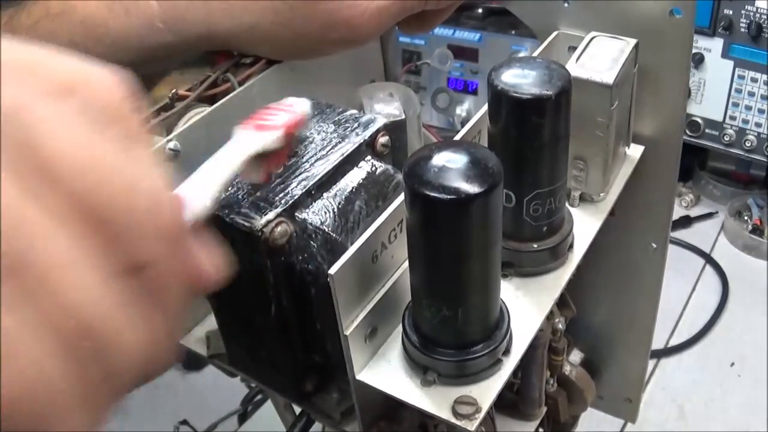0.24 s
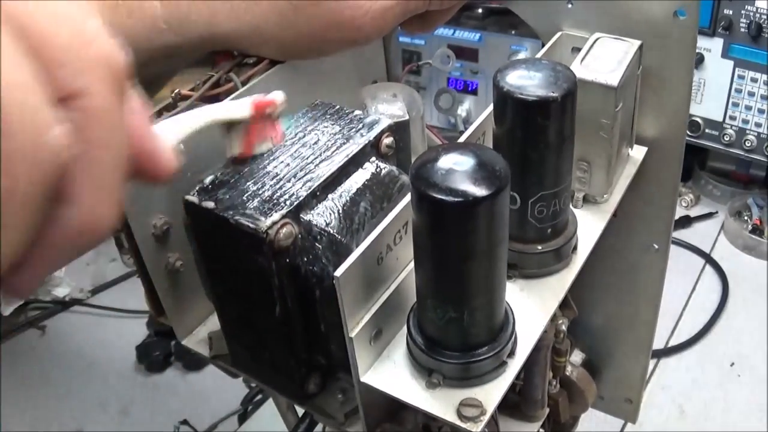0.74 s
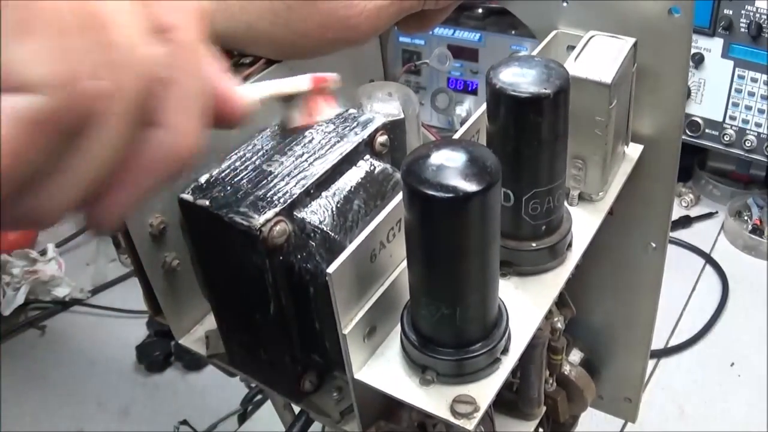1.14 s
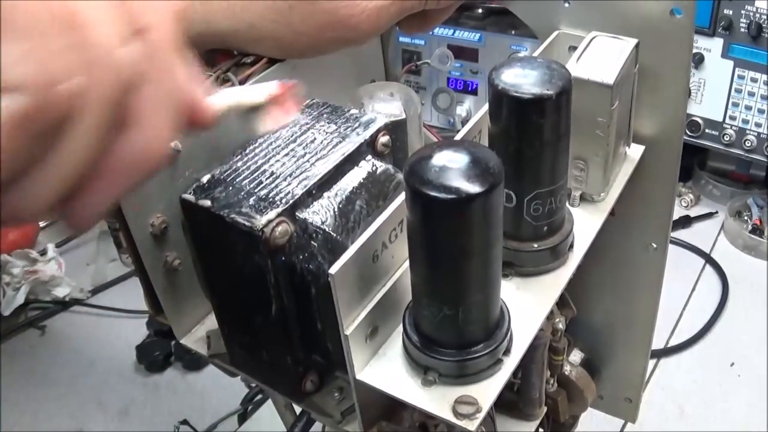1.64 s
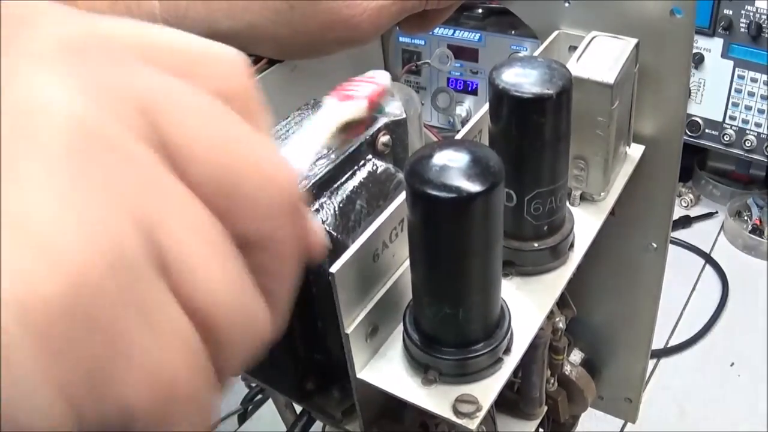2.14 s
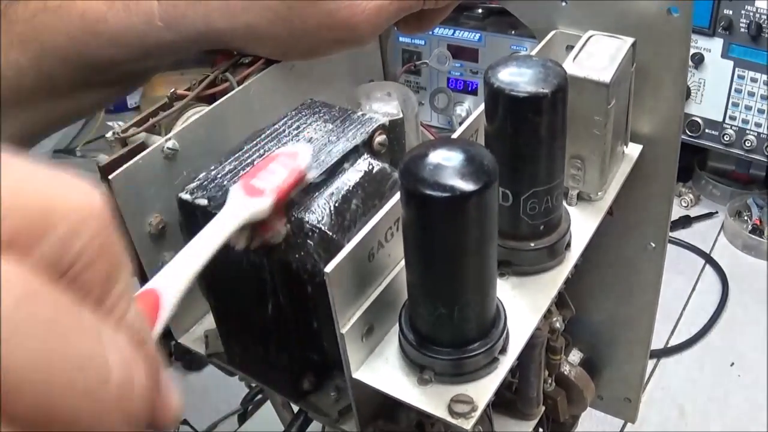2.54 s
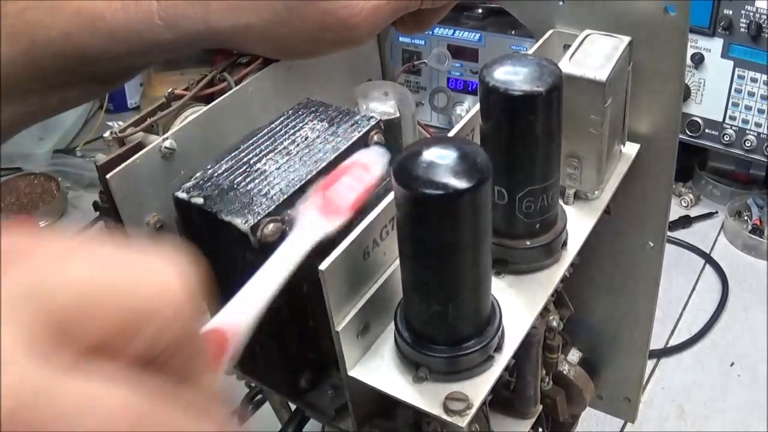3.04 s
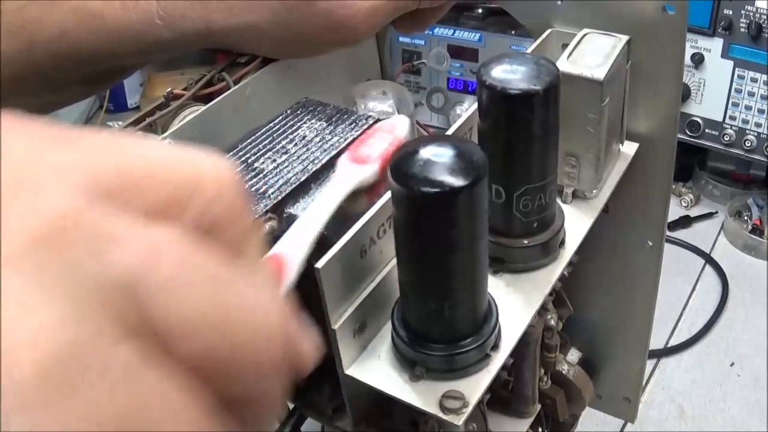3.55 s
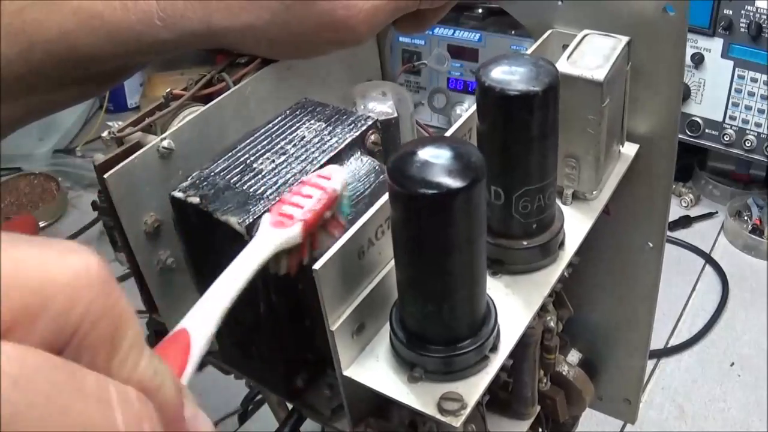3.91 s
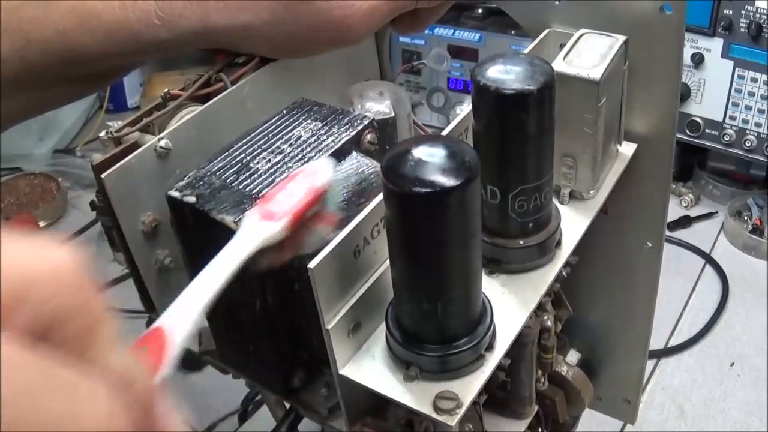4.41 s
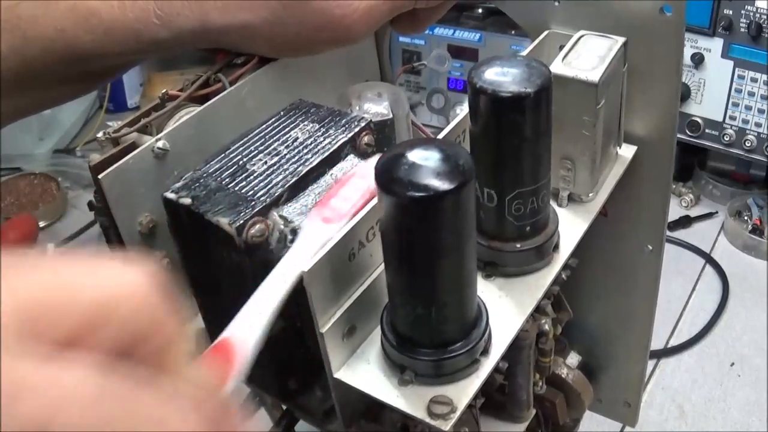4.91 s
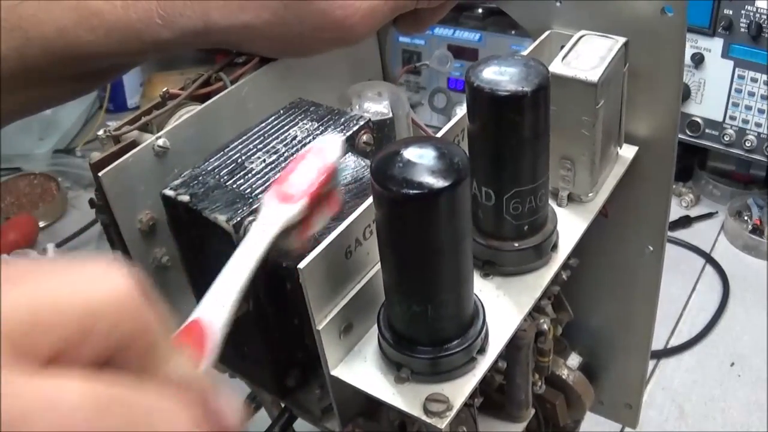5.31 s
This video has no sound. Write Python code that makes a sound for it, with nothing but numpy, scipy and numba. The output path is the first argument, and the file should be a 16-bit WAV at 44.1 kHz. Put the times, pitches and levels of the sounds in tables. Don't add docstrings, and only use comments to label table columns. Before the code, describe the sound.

Stiff toothbrush bristles scrub a ridged metal block in quick, even back-and-forth strokes, crisp and bright, with occasional plastic knocks on metal.

```python
import sys
import numpy as np
from scipy import signal
from scipy.fft import rfft, irfft
from scipy.io import wavfile
from scipy.ndimage import uniform_filter1d
from numba import njit

SR = 44100
rng = np.random.default_rng(int(sys.argv[2]) if len(sys.argv) > 2 else 0)


def persist_wave(psi):
    counts = np.round(np.clip(psi, -1, 1) * 32767).astype(np.int16)
    wavfile.write(sys.argv[1], SR, np.atleast_2d(counts).T)


def amplitude_ratio(level_db):
    exponent = np.asarray(level_db, float) / 20
    return 10 ** exponent


N = 245584
T = np.arange(N) / SR
TAPS = 8192
HZ = np.fft.rfftfreq(TAPS, 1 / SR) + 1e-3

# catch in seconds, length in seconds, effort in dB,
# late minus early loudness in dB, depth into the chassis gap [0-1].
PUSHES = [(-.025, 0.11, -15.5, 0.5, .45), (0.269, 0.091, -15.5, -3.5, 0.36), (0.541, 0.082, -16.5, 5, 0.55),
          (0.783, 0.098, -16, 1, 0.17), (1.044, 0.083, -16.5, 2, 0.34), (1.289, .1, -22, 3.5, 0.36),
          (1.533, 0.089, -19.5, 0, 0.2), (1.802, 0.091, -16.5, -2, 0.2), (2.071, 0.11, -17.5, 1.5, 0.4),
          (2.345, 0.11, -13.5, .5, 0.76), (2.629, 0.088, -12.5, 2, 0.53), (2.9, 0.097, -19.5, -1, 0.47),
          (3.166, .112, -20, 3, 0.05), (3.442, 0.1, -21.5, -3, 0.36), (3.711, .094, -15, 3, 0.66),
          (3.993, 0.1, -18, 1, 0.77), (4.246, 0.1, -17.5, 0.5, 0.83), (4.515, 0.093, -14, -4.5, 0.97),
          (4.772, .1, -16.5, 9.5, 0.87), (5.049, 0.11, -17, -2, 0.5), (5.314, 0.1, -17.5, 2.5, 0.88),
          (5.562, 0.053, -22, -1, 0)]
# catch in seconds, length in seconds, effort in dB,
# late minus early loudness in dB, depth into the chassis gap [0-1].
PULLS = [(0.117, 0.11, -18, -0.5, 0.03), (0.4, 0.093, -20, -5, 0.4), (0.652, 0.089, -12, -.5, 0.03),
         (.904, 0.1, -17.5, -1, 0.06), (1.176, 0.088, -18.5, -4, 0), (1.424, 0.083, -15.5, -1, 0.08),
         (1.667, 0.11, -18, -6, .05), (1.928, 0.1, -15, -1, 0.), (2.214, 0.099, -15.5, -2.5, .05),
         (2.484, 0.11, -10.5, -1.5, 0.18), (2.768, 0.1, -11.5, -8.5, 0.5), (3.051, 0.096, -12, -8, 0.25),
         (3.3, 0.11, -21, 4.5, .4), (3.583, 0.096, -14.5, 0.5, 0.61), (3.864, 0.089, -12.5, -2.5, 0.74),
         (4.122, 0.092, -12.5, 4.5, 0.53), (4.386, 0.085, -9.5, 0.5, 0.67), (4.654, 0.091, -12, -3, 0.53),
         (4.921, 0.086, -17.5, 1.5, 1.05), (5.199, 0.087, -15, -3, 0.8), (5.448, 0.096, -15.5, 1, 0.96)]
# frequency in Hz, side minus mid in dB.
WIDTH = [(60, -49), (110, -25), (200, -13.5), (380, -12), (700, -8.5), (1290, -13), (2380, -20.5),
         (4400, -18.5), (8120, -16.5), (15000, -16)]


def unit(x):
    return x / np.sqrt(np.mean(x ** 2))


def curve(points):
    hz, db = np.transpose(points)
    return amplitude_ratio(np.interp(np.log(HZ), np.log(hz), db))


def causal(x, gain):
    cepstrum = irfft(np.log(gain + 1e-9))
    cepstrum[1:TAPS // 2] *= 2
    cepstrum[TAPS // 2 + 1:] = 0
    response = irfft(np.exp(rfft(cepstrum)))
    return signal.oaconvolve(x, response)[:len(x)]


def band(x, lo_hz, hi_hz):
    return signal.sosfilt(signal.butter(3, [lo_hz, hi_hz], "bandpass", fs=SR, output="sos"), x)


@njit
def svf(x, hz, width):
    y, b, l = np.empty(len(x)), 0., 0.
    for i in range(len(x)):
        g, k = np.tan(np.pi * hz[i] / SR), width / hz[i]
        v = (b + g * (x[i] - l)) / (1 + g * (g + k))
        b, l, y[i] = 2 * v - b, l + 2 * g * v, k * v
    return y


def ring(x, hz, t60):
    pole = np.exp(2j * np.pi * hz / SR - np.log(1000) / (t60 * SR))
    return signal.lfilter([1], [1, -pole], x).imag


def walk(rate):
    hold = int(SR / rate)
    levels = np.repeat(rng.standard_normal(N // hold + 1), hold)
    return unit(uniform_filter1d(levels, hold)[:N])


def slips(share, spread_db):
    when, size, sign = rng.random(N), rng.exponential(size=N), rng.standard_normal(N)
    return unit((when < share) * sign * amplitude_ratio(spread_db * np.minimum(size, 4.5)))


def strokes():
    return np.transpose(sorted(PUSHES + PULLS))


def hand_speed():
    # time in seconds, dB above a clean turn.
    turn_changes = [(-.04, 9), (.77, -5), (1.28, 4), (1.53, 14), (1.79, 17.5), (1.91, 3), (2.33, 6),
                    (3.02, 14), (3.43, -12), (3.84, 7), (3.97, 6), (4.11, 7), (4.63, 5.5), (4.76, -22),
                    (5.03, -6), (5.55, 3)]
    clean_turn_db, edge_db = -42.5, -5
    catch_s, release_s = 0.014, 0.013
    flat_db, arch_per_db = -21.5, 0.55

    catch, length, middle_db, lean_db, _ = strokes()
    release = catch + length
    turn = (catch + np.append(catch[0] - .03, release[:-1])) / 2
    rest_db = np.full(len(turn), clean_turn_db)
    for s, db in turn_changes:
        rest_db[np.argmin(np.abs(turn - s))] += db

    shoulder_db = middle_db - arch_per_db * np.maximum(middle_db - flat_db, 0)
    early_db = shoulder_db - lean_db / 2
    late_db = shoulder_db + lean_db / 2
    when = [turn, catch, catch + catch_s, (catch + release) / 2, release - release_s, release]
    db = [rest_db, early_db + edge_db, early_db, middle_db, late_db, late_db + edge_db]
    level_db = np.interp(T, np.ravel(when, "F"), np.ravel(db, "F"))
    return amplitude_ratio(uniform_filter1d(level_db, size=150))


def angle():
    # time in seconds, tips facing the camera [0-1], left minus right
    # in dB, pitch of the core and gap as a factor, weight on the core in dB.
    wrist = [(0., 0, 1.4, 1., -1), (.5, 1., 1.9, 0.99, 2.5), (1., 0.84, 2, 0.96, 1),
             (1.35, 0.76, 1.9, 0.96, 0), (1.6, 1., 2, 0.99, 0.5), (2., 0.67, 1.5, 0.99, -1),
             (2.4, 0.34, .5, 0.99, 1.5), (2.65, 0.54, 0.7, 0.99, 0), (3., 0.63, 1., 0.97, 0),
             (3.22, 0.7, 0.7, 0.94, -4), (3.45, .6, 0.5, 1.02, -1), (3.75, 0, 1, 1.02, -0.5),
             (4., .3, .3, 1, 0), (4.3, .3, .9, 0.95, 0.5), (4.6, 0, .6, 1.01, 0), (5., 0.25, 1, 1, 0),
             (5.3, 0.06, 1.1, .93, 2), (5.57, 0.35, 1.1, 0.82, 0)]
    # base in dB, dB per facing, dB per depth,
    # dB per dB of effort above the usual.
    gap_law = (-18, -1.5, 14.5, 0.)
    tips_law = (-1.5, 4, -1.5, 0.)
    core_law = (-19.5, 2.14, 4, -0.07)
    air_law = (-18.5, 8.5, 0.5, 0)
    usual_db = -16

    catch, length, effort_db, _, depth = strokes()
    middle = catch + length / 2
    s, facing, pan_db, pitch, weight_db = np.transpose(wrist)
    controls = [1, np.interp(T, s, facing), np.interp(T, middle, depth),
                np.interp(T, middle, effort_db - usual_db)]
    shares = []
    for law in (gap_law, tips_law, core_law, air_law):
        shares.append(sum(k * control for k, control in zip(law, controls)))
    shares[2] = shares[2] + np.interp(T, s, weight_db)
    return *shares, np.interp(T, s, pan_db), np.interp(T, s, pitch)


def brush():
    # frequency in Hz, level in dB per Hz.
    brush_colour = [(410, -57), (800, -25), (1200, -21), (2100, -14), (3200, -9.5), (3950, -7), (4700, 1.5),
                    (5300, -4), (6450, -2), (7700, -2.5), (9400, 0.5), (11900, -6), (15000, -6.5),
                    (15900, -25)]
    border_hz = [3364, 5450, 7570, 12850]
    # centre in Hz, width in Hz, share by which the pitch wanders,
    # strength as a factor, share of the lean to the left.
    tufts = [
        (2300, 1550, 0.19, 0.23, 0.42),
        (4080, 880, 0.031, 0.86, 0.45),
        (6590, 2270, 0.047, 0.66, 1.2),
        (9410, 4000, 0.053, 0.51, 2.9),
        (12600, 5200, 0.1, 0.55, 1.1),
    ]

    speed = hand_speed()
    gap_db, tips_db, core_db, air_db, pan_db, pitch = angle()
    shaft = 1 / np.sqrt(1 + amplitude_ratio(2 * tips_db))
    gains = [amplitude_ratio(core_db), amplitude_ratio(gap_db), shaft, shaft * amplitude_ratio(tips_db), amplitude_ratio(air_db)]
    rough = amplitude_ratio(2.8 * walk(40) + 0.7 * walk(250))
    common = slips(.3, 3.2) * rough * speed
    scattered = slips(0.4, 2.9) * rough * speed
    below = [1 / (1 + (HZ / hz) ** 15) for hz in border_hz]
    masks = np.diff([0 * HZ, *below, 0 * HZ + 1], axis=0)

    mid = side = 0
    for mask, gain, (hz, width, wander, strength, lean) in zip(masks, gains, tufts):
        shape = curve(brush_colour) * np.sqrt(np.maximum(mask, 1e-9))
        shape = unit(shape)
        clumps = speed * amplitude_ratio(2.2 * walk(35) + 2.2 * walk(150))
        centre = hz * (1 + wander * walk(14)) * (pitch if hz < border_hz[1] else 1)
        once = svf(slips(.3, 3.2), centre, float(width))
        tuft = unit(svf(once, centre, float(width))) * clumps
        region = gain * (0.9 * causal(common, shape) + strength * tuft)
        mid = mid + region
        side = side + region * np.tanh(lean * pan_db * np.log(10) / 70)
        side = side + gain * causal(scattered, shape * curve(WIDTH))
    return mid, side


def jolts():
    # time in seconds, handle rub in dB, bench rumble in dB.
    bench_jolts = [(.05, -71, -58), (.43, -46, -46), (.52, -47.5, -65), (.91, -56, -46), (1.18, -59, -45),
                   (2.15, -80, -55), (2.39, -51, -52), (2.53, -38, -52), (2.96, -55, -58), (3.32, -56, -52),
                   (3.89, -53, -44.5), (4.62, -48, -44), (4.88, -49, -58), (5.3, -49, -69)]
    rise_s, fall_s = 0.035, 0.032
    rub, rumble = amplitude_ratio(-53.5), amplitude_ratio(-58)
    for s, rub_db, rumble_db in bench_jolts:
        swell = np.exp(-np.maximum((s - T) / rise_s, (T - s) / fall_s))
        rub = rub + amplitude_ratio(rub_db) * swell
        rumble = rumble + amplitude_ratio(rumble_db) * swell
    return rub, rumble


def shop():
    # frequency in Hz, level in dB per Hz.
    air_colour = [(20, -10.5), (36, -9), (50, -3.5), (108, -11), (218, -8), (400, -10.5), (886, -13.5),
                  (1300, -7.5), (3000, -8), (8000, -31), (16000, -56)]
    # frequency in Hz, level in dB.
    mains_tones = [(119.7, -60), (360, -59)]
    air_db = -44

    rub_gain, rumble_gain = jolts()
    pair = []
    for noise in rng.standard_normal((2, 3, N)):
        air = unit(causal(noise[0], curve(air_colour))) * amplitude_ratio(air_db + 3.3 * walk(3.38))
        rub = unit(band(noise[1], 253, 756)) * rub_gain * amplitude_ratio(3.0 * walk(30))
        rumble = unit(band(noise[2], 56, 162)) * rumble_gain
        pair.append(air + rub + rumble)
    hum = sum(amplitude_ratio(db + 2.5 * walk(7.9)) * np.sin(2 * np.pi * hz * T) for hz, db in mains_tones)
    return pair[0] + hum, causal(pair[1], curve(WIDTH))


def snaps():
    # time in seconds, peak in dB.
    extra_snaps = [(.0237, -3), (.031, -4), (.1341, -6), (.1435, -5), (.1453, -3), (.2779, -5), (.2847, -5),
                   (.4266, -3), (.5896, -5), (.596, -4), (.6662, -5), (.6796, -5), (.8529, -4), (2.863, -3),
                   (.9333, -5), (.9402, -3), (1.1009, -5), (1.1192, -6), (.876, -6), (1.1907, -6),
                   (1.1986, -3), (1.2041, -5), (1.2067, -4), (1.219, -4), (1.4445, -4), (3.1288, -2),
                   (3.411, -9), (3.7193, -7), (3.7547, -6), (4.9827, -5)]
    catch_snap_db = -5
    catches = [(s, db + catch_snap_db) for s, _, db, *_ in PUSHES[1:] + PULLS]
    events = extra_snaps + catches
    clicks = np.zeros(N)
    for (when, db), sign in zip(events, np.sign(rng.standard_normal(len(events)))):
        clicks[int(when * SR)] += sign * amplitude_ratio(db)
    return 3.1 * band(clicks, 4500, 13500)


def knocks():
    # time in seconds, peak in dB, rattle length in seconds, centre in Hz, core ring in dB.
    head_knocks = [(2.517, -14, 0.009, 1300, -2), (3.2512, -8, 0.024, 1850, 6),
                   (3.303, -20.5, 0.012, 2000, 1), (3.786, -8.5, 0.029, 1900, 7),
                   (4.6043, -7.5, .004, 1450, -8), (4.8222, -6.5, 0.006, 1360, 2.5),
                   (4.8478, -8, 0.024, 1880, -7), (4.9172, -15, 0.015, 1690, -9),
                   (4.956, -18.5, .02, 1660, -14), (4.862, -13.5, 0.017, 2200, -10),
                   (4.929, -22, 0.023, 1700, -14), (3.263, -16, .012, 2100, -2),
                   (3.797, -11, 0.01, 2000, 12.5), (5.48, -18, .03, 2700, -11),
                   (.808, -22.5, 0.0077, 2300, -5), (4.2707, -21, 0.0054, 2300, -8)]
    # frequency in Hz, level in dB, time to fall 60 dB in seconds.
    plate_notes = [(900, 1.5, 0.04), (1205, 3, 0.048), (1450, 6, 0.026), (1620, 10.5, 0.014),
                   (1850, 10.5, 0.013), (2070, 9.5, 0.046), (2430, 10, 0.015), (2660, 6.5, 0.032),
                   (2700, 6, 0.023), (3360, -9, .015)]
    # frequency in Hz, level in dB, time to fall 60 dB in seconds.
    core_notes = [(3190, -2.5, 0.0065), (3810, -4.5, 0.027), (4290, -2, 0.026), (4630, 2.5, 0.022),
                  (4815, 6, 0.013), (5200, -13, 0.012), (6420, -2, 0.013), (8200, 3, 0.0078),
                  (9800, -5, 0.015)]

    out = np.zeros(N)
    age = np.arange(6000) / SR
    chance = rng.standard_normal((len(head_knocks), 2, 6000))
    for (when, db, length, hz, core_db), (size, pick) in zip(head_knocks, chance):
        push = 0.13 * size * (pick > 1.1) * (age < length) * np.exp(-age / 0.16)
        push[0] = 1.18
        plate = core = 0
        for k, (f, g, t60) in enumerate(plate_notes):
            near_db = g - 4.5 * np.log2(f / hz) ** 2
            plate = plate + (-1) ** k * amplitude_ratio(near_db) * ring(push, f, t60)
        for k, (f, g, t60) in enumerate(core_notes):
            core = core + (-1) ** k * amplitude_ratio(g) * ring(push, f, t60)
        crack = push / np.abs(push).max()
        sound = 0.13 * crack + plate / np.abs(plate).max() + amplitude_ratio(core_db) * core / np.abs(core).max()
        i = int(when * SR)
        out[i:i + 6000] += amplitude_ratio(db) * band(sound, .6 * hz, 11000)[:N - i]
    return out


def thuds():
    # time in seconds, peak in dB, frequency in Hz, time to fall 60 dB in seconds.
    soft_thuds = [
        (2.289, -32.5, 445, 0.039),
        (2.37, -25.5, 497, 0.02),
        (2.94, -37.5, 415, 0.39),
        (3.879, -37.5, 82.6, 0.21),
        (4.255, -28.5, 463, 0.039),
        (4.63, -34, 50.3, 0.17),
        (4.91, -39, 55, 0.24),
    ]
    out = np.zeros(N)
    for when, db, hz, t60 in soft_thuds:
        push = np.zeros(16000)
        push[:int(SR / hz)] = np.hanning(int(SR / hz))
        notes = ring(push, hz, t60) + .6 * ring(push, 1.4 * hz, t60 * .7)
        sound = band(notes, .6 * hz, 3 * hz)
        out[int(when * SR):][:16000] += amplitude_ratio(db) * sound / np.abs(sound).max()
    return out


def scene():
    scrub, scrub_side = brush()
    air, air_side = shop()
    blows = knocks()
    near = scrub + snaps() + blows + thuds()

    tails = rng.standard_normal((2, 9000)) * np.exp(-np.arange(9000) / SR / 0.03)
    tails = tails / np.linalg.norm(tails[0])
    room = amplitude_ratio(-16.5) * signal.oaconvolve(near[None], tails, axes=1)[:, :N]

    mid = near + air + room[0]
    side = scrub_side + air_side + amplitude_ratio(-6) * band(room[1], 300, 13200)
    side = side + amplitude_ratio(-18) * np.roll(blows, shift=6)
    side = signal.sosfiltfilt(signal.butter(2, 12500, fs=SR, output="sos"), side)
    return np.array([mid + side, mid - side])


def band_limit(x):
    return signal.sosfilt(signal.butter(12, 16050, fs=SR, output="sos"), x)


def record(dry):
    rounded = .92 * np.tanh(dry / .92)
    return band_limit(rounded)


dry = scene()
out = record(dry)
persist_wave(out)
```